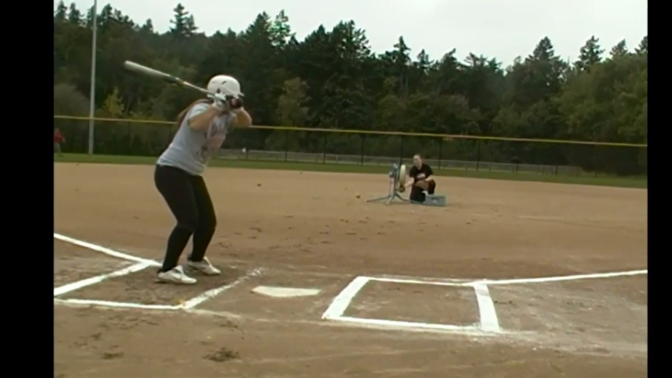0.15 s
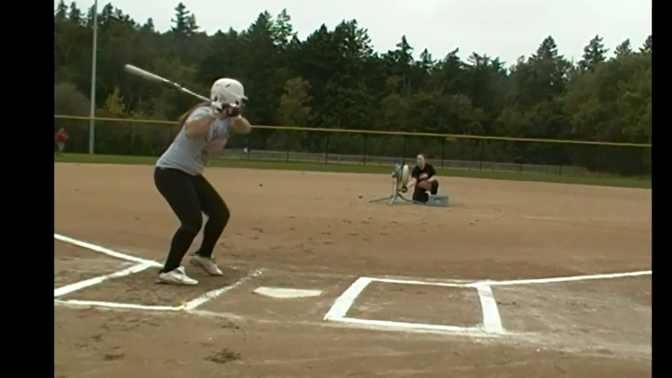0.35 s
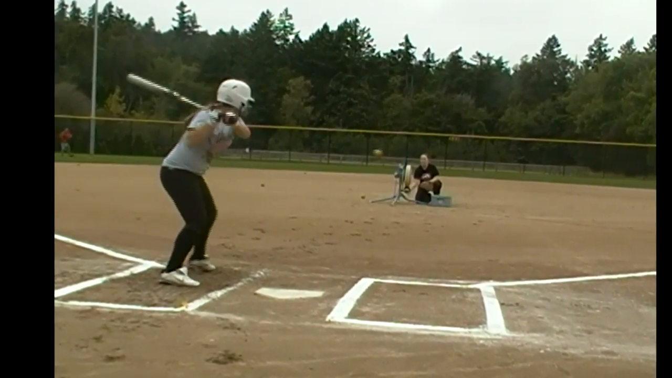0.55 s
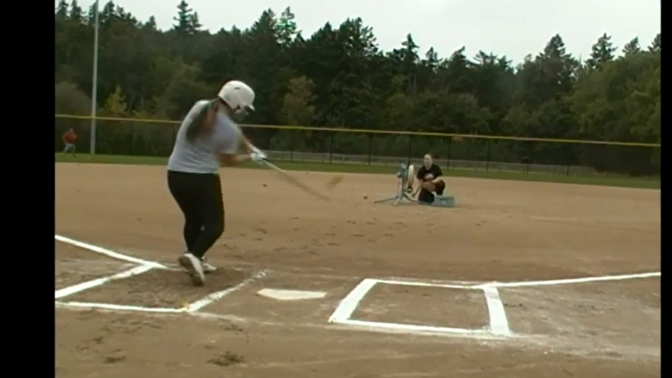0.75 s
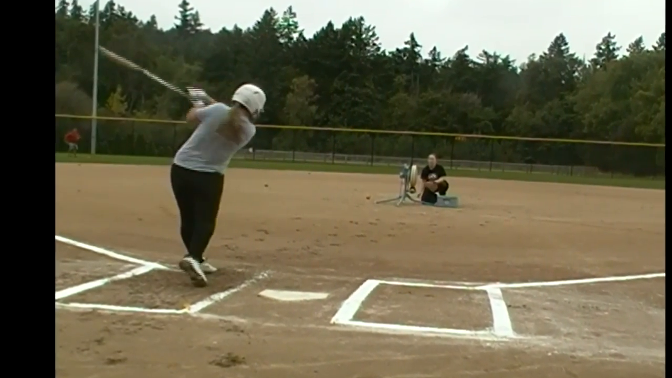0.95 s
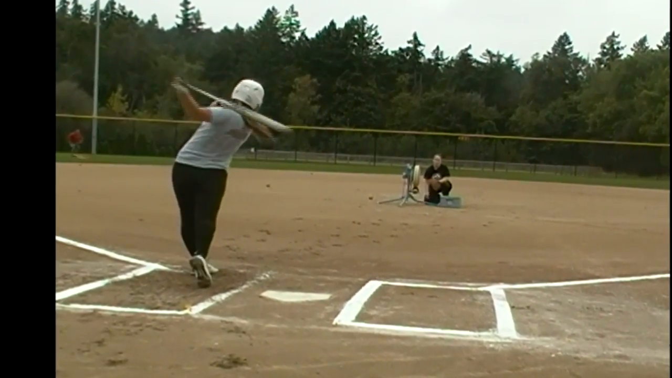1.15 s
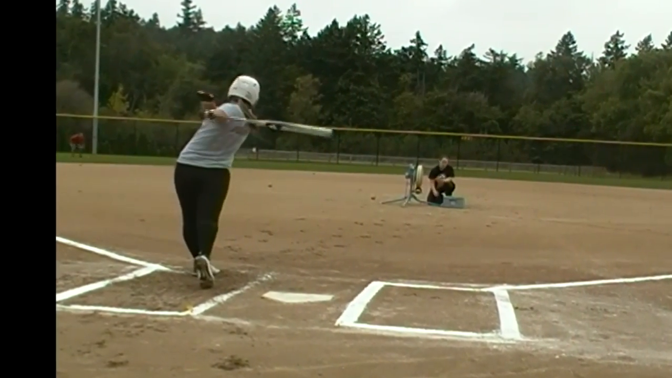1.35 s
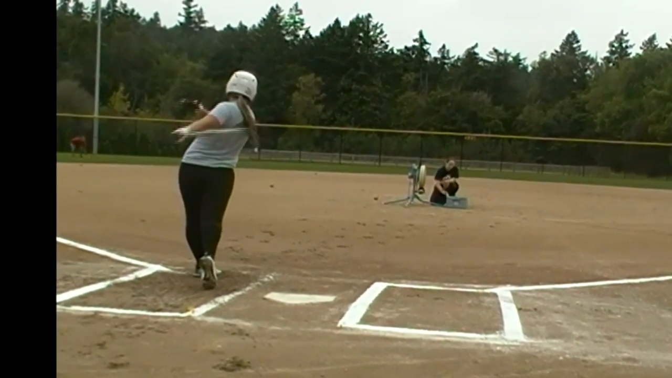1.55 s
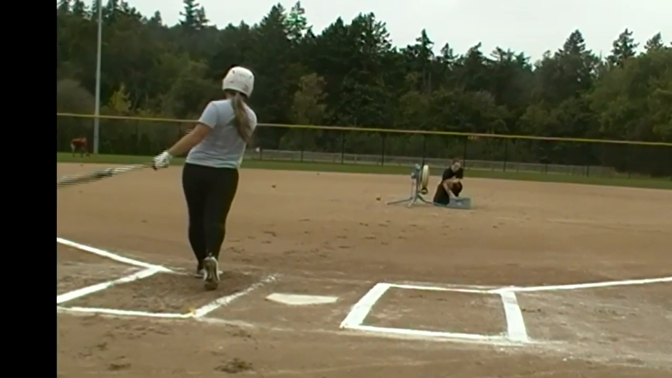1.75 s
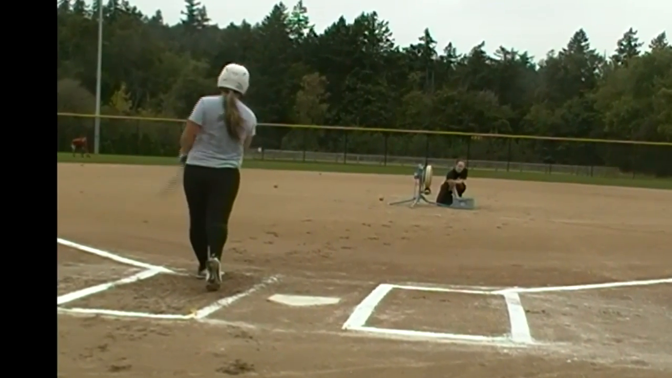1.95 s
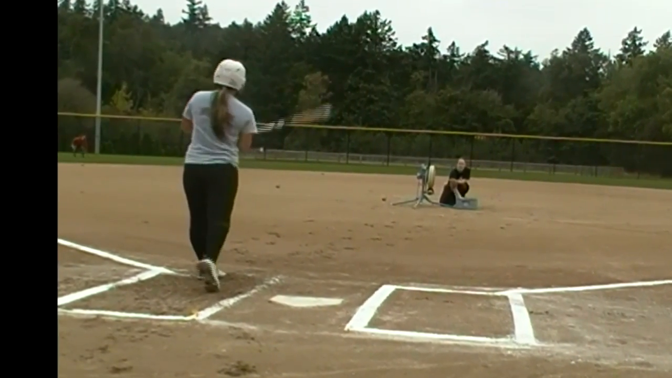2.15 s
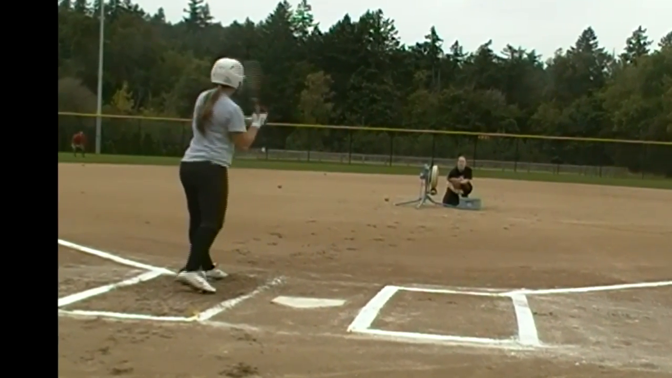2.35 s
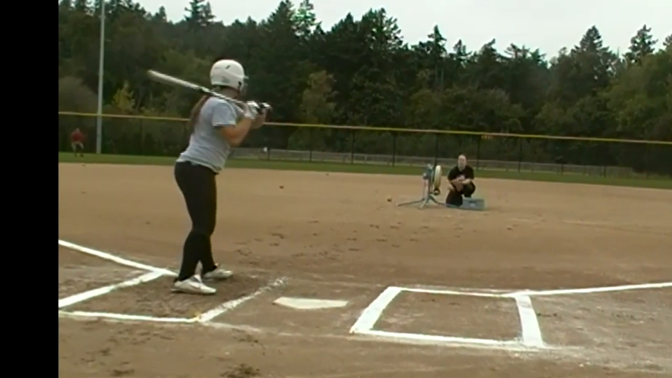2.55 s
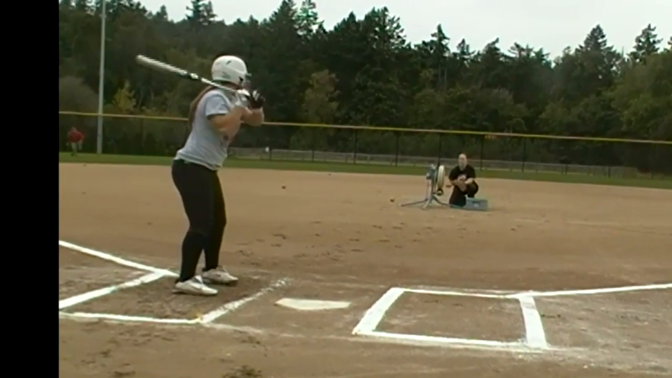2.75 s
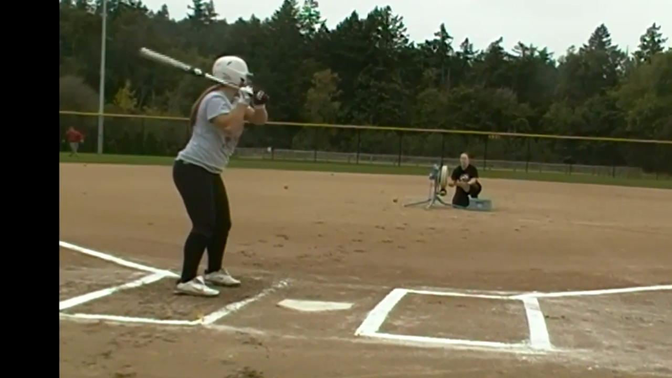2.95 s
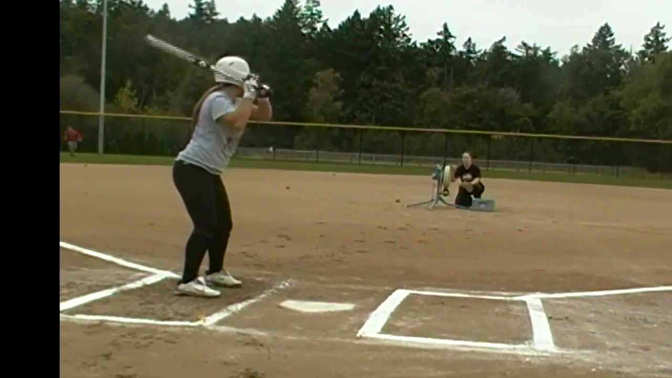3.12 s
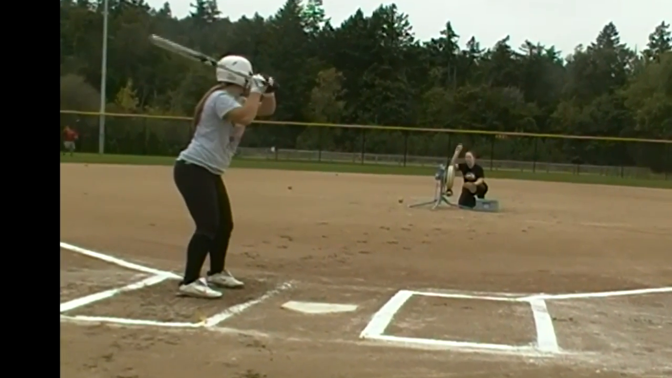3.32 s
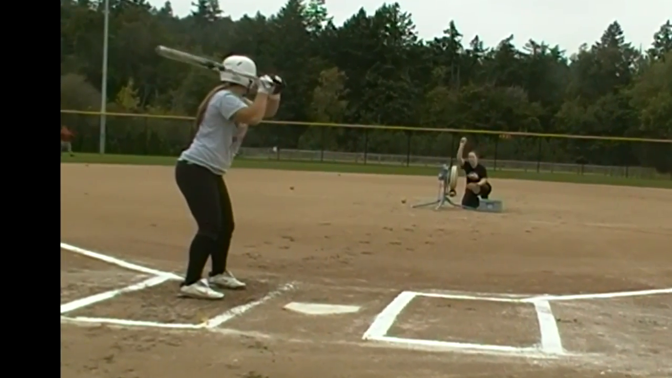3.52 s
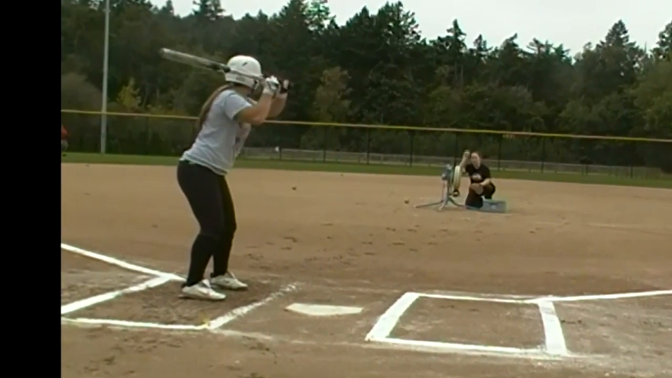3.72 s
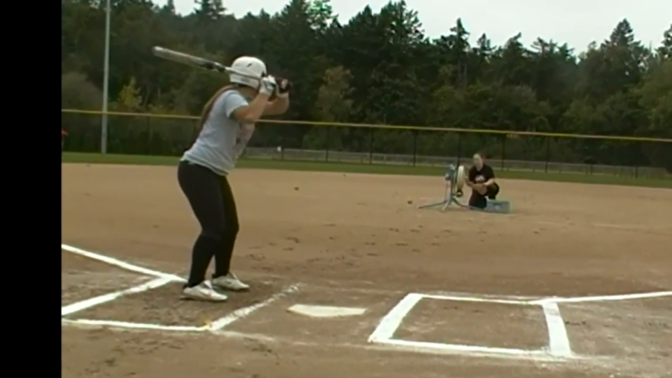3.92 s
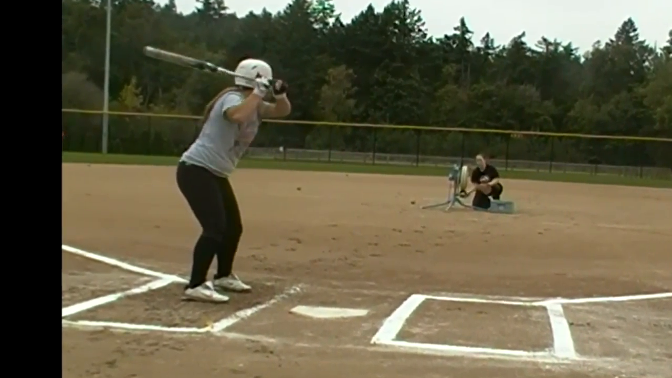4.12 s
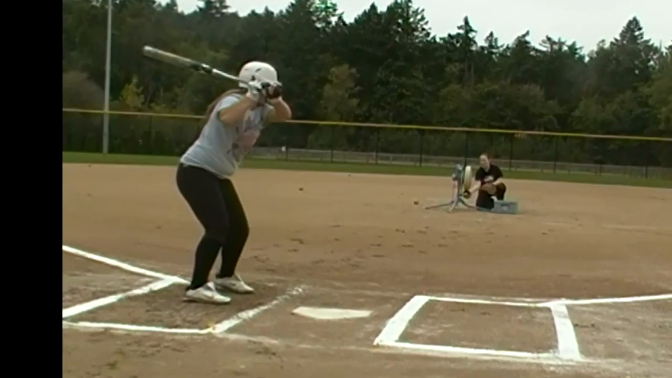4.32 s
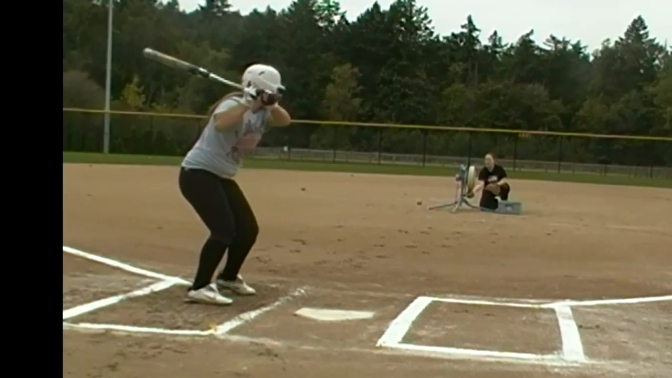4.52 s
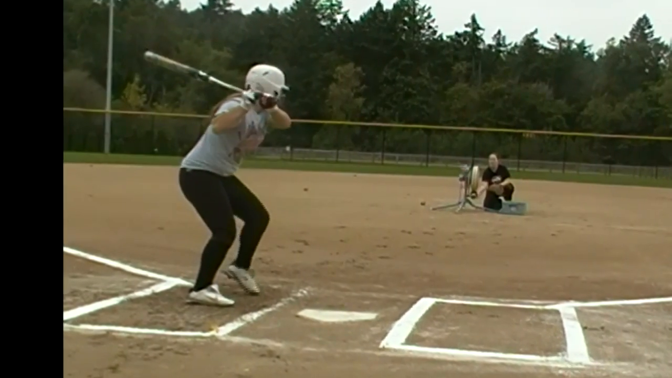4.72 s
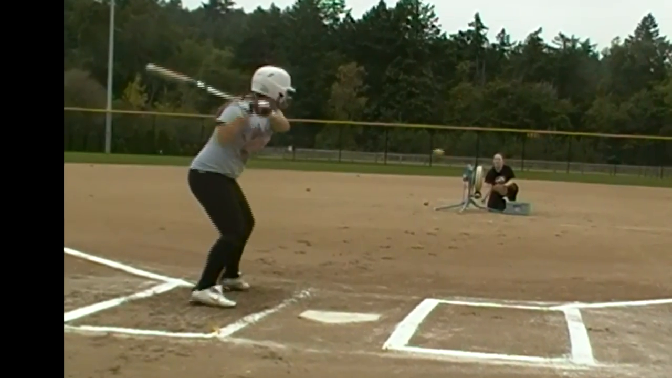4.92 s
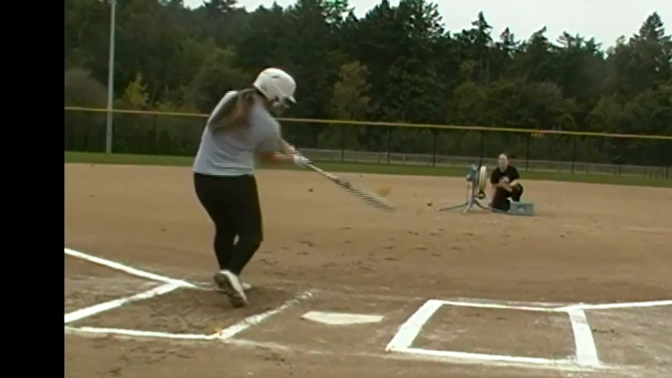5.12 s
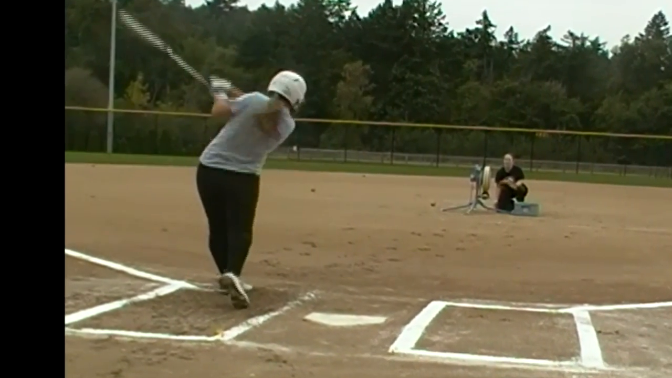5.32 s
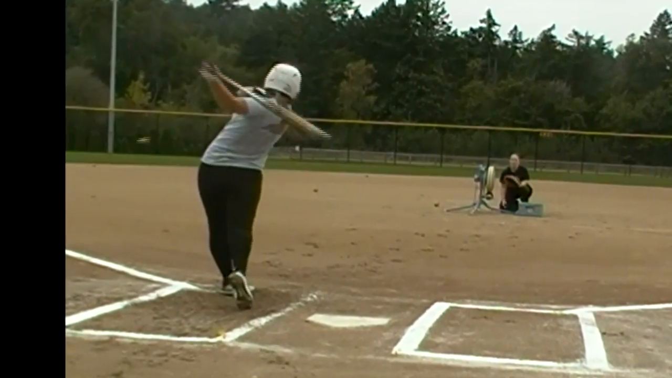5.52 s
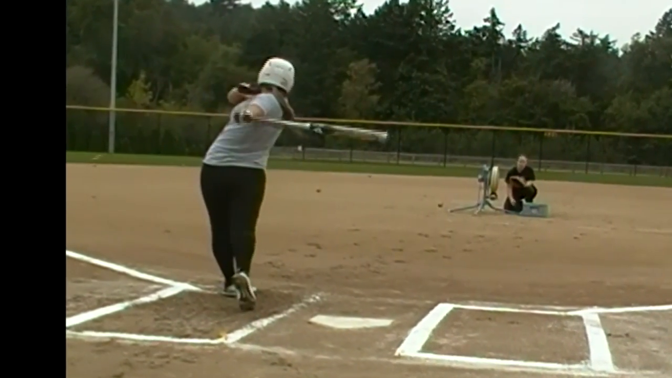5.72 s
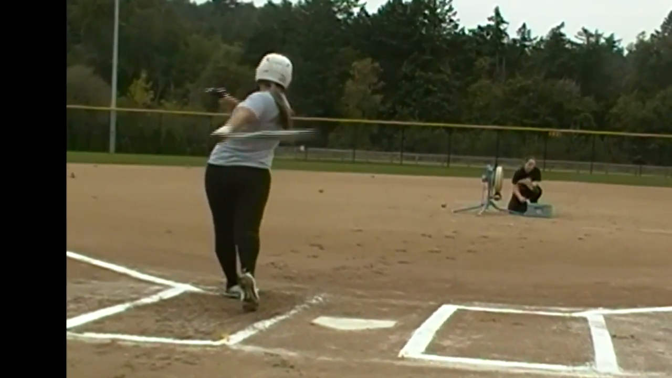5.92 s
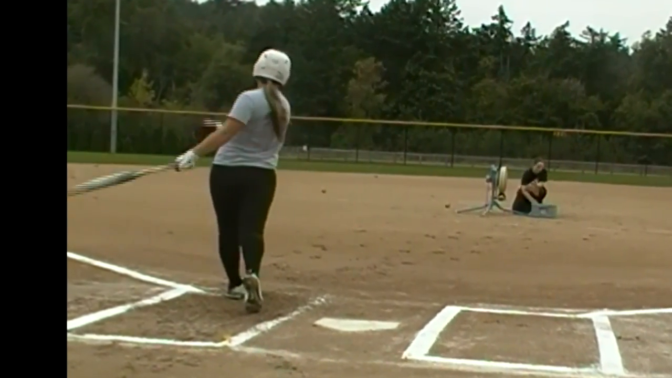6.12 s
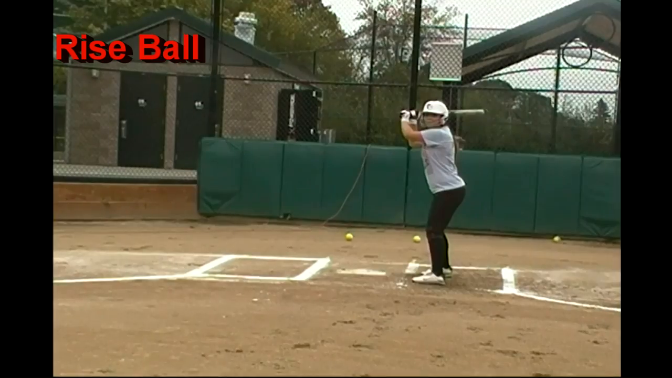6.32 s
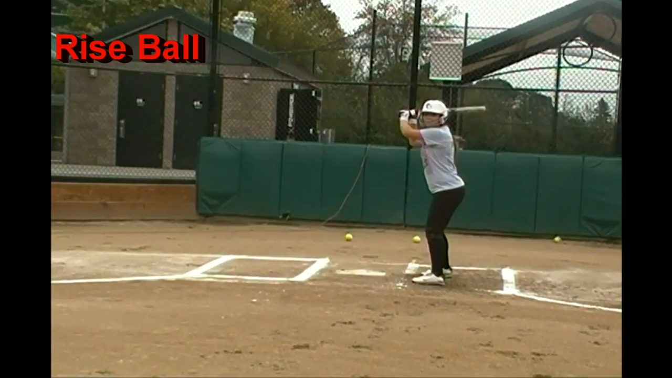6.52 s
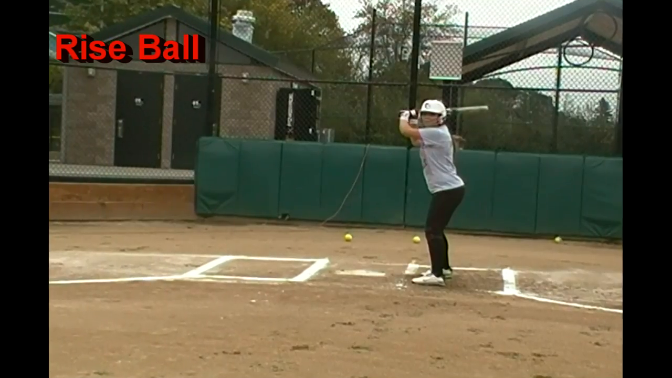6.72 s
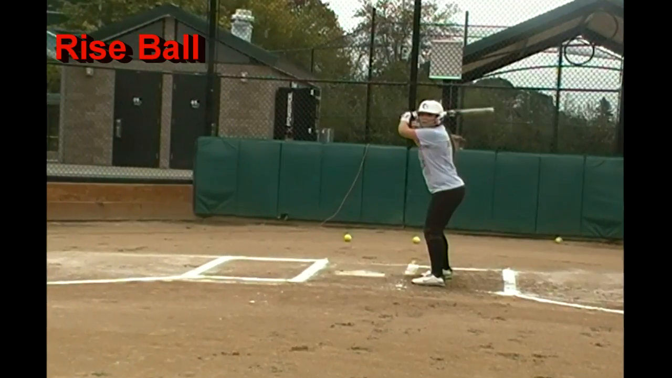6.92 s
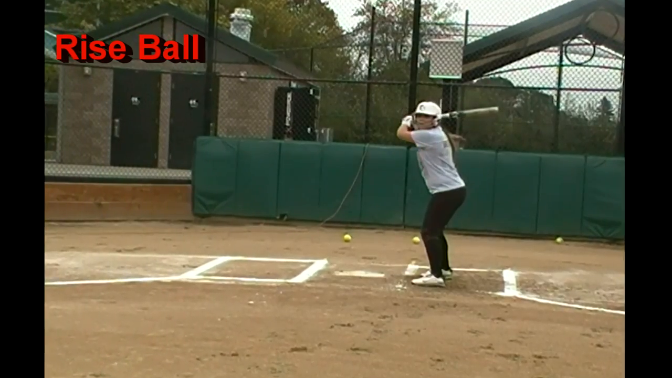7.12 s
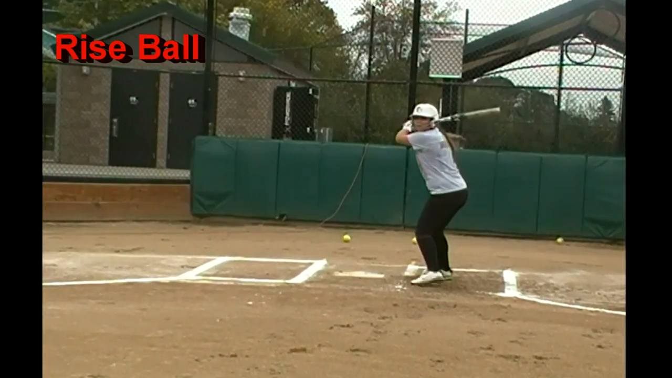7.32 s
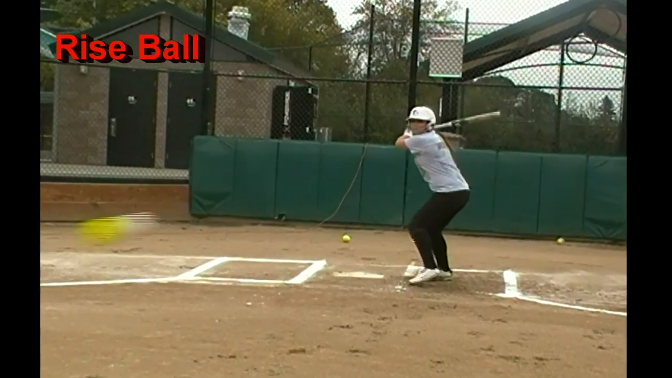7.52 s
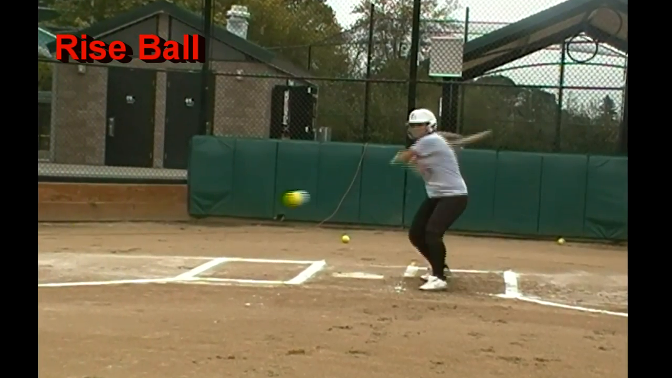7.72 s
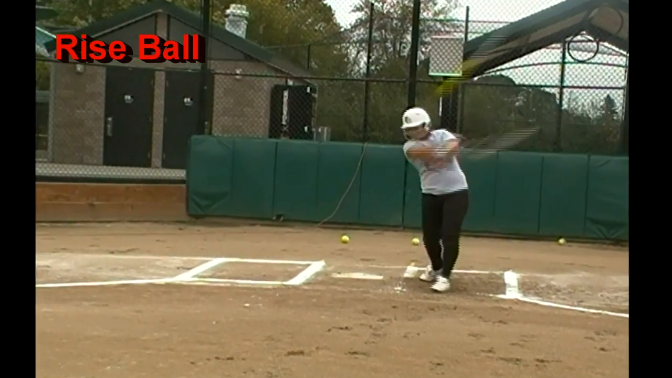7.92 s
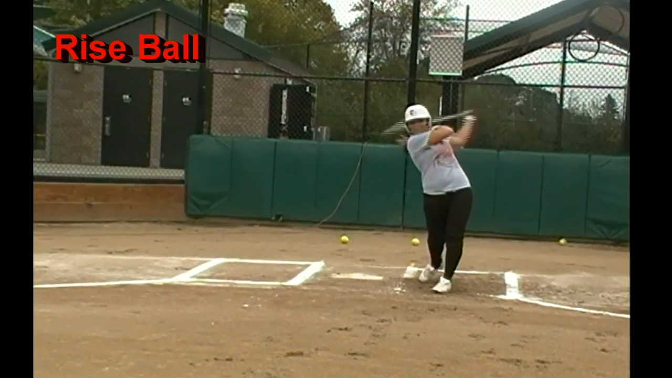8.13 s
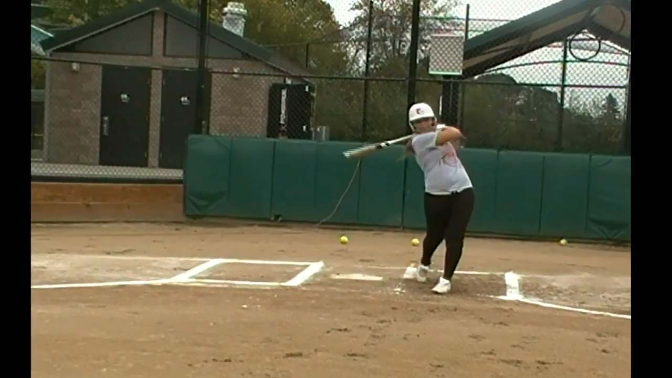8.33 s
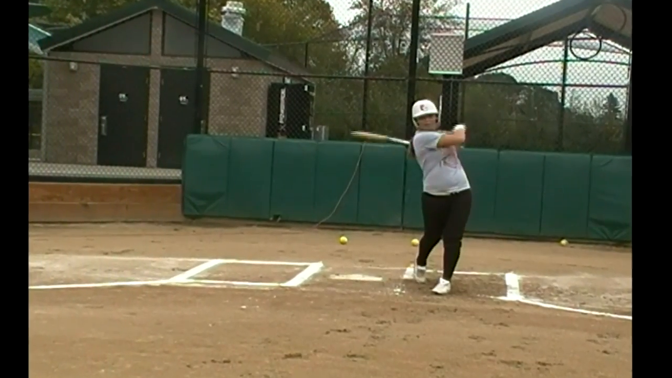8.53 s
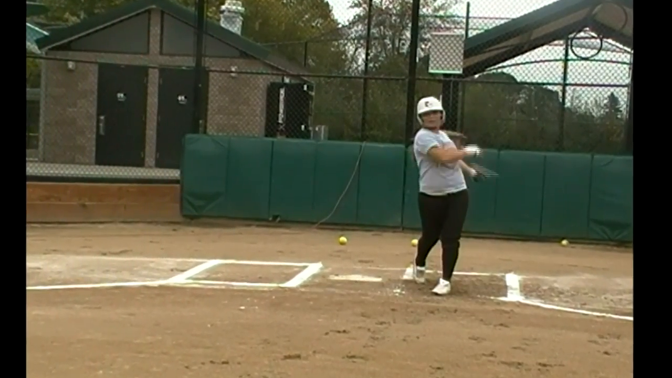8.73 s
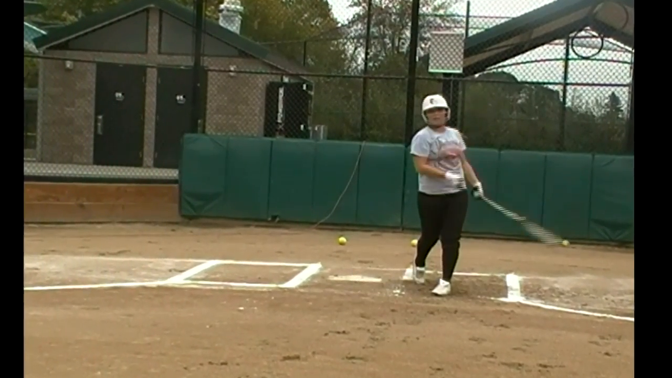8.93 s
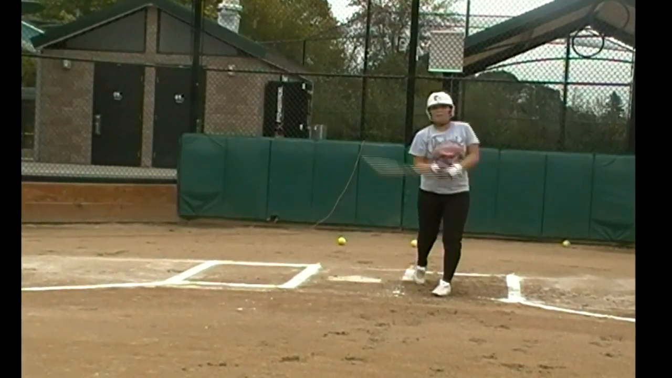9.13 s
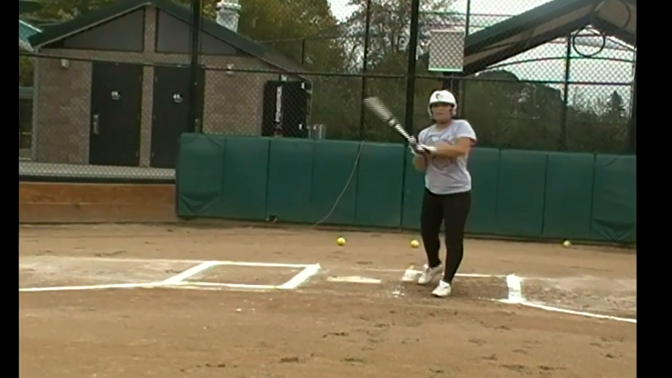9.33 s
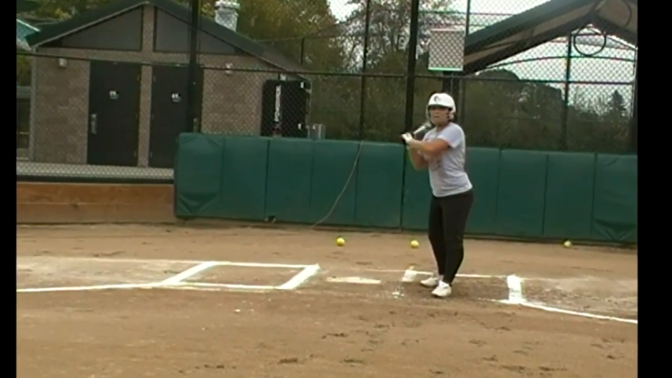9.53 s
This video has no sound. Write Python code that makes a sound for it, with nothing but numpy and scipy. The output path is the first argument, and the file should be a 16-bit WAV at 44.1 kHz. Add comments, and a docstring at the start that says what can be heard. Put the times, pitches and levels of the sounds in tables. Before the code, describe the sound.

From 0 to 6.3 seconds the microphone is behind the plate on an open field: a soft mid-low hum, strongest at first and gradually fading, with low rumble and a thin far motor whine. At about 0.45 a distant machine gives a muffled thump; at 0.96 a bat cracks loudly, dry and hard, with immediate backstop slap, later faint echoes and a brief tree-line wash. A dull thud follows at 1.1, then faint ticks and foot scuffs around 1.8 and 2.5. Feeding rattles at 4.75 lead to another thump at 4.8 and a brighter, stronger crack at 5.3. A light thud comes at 6.1. After a tiny gap, from 6.3 a loud close motor whirs steadily, rough and whiny. At 7.55 a ball clatters and launches with a heavy thump and snap; the motor sags slightly. A farther hit knocks at 8.02, its stronger slaps at 8.07, then motor continues alone.

```python
"""Mains hum, field rumble and a far motor open the scene behind the plate of an outdoor field, where a wheel
machine throws two pitches and a bat meets each; after a short gap its loud motor is heard from close by, with
one pitch and a far hit. Pulsed resonances make ball, feet and far hit; decaying modes with reflections make
the near bat; turn-locked tones, a scrape and shaped noise make the near motor. A stereo microphone receives
all of it, and its gain control ducks after loud peaks."""
import sys
import numpy as np
from scipy import signal
from scipy.fft import rfft, irfft
from scipy.io import wavfile
from scipy.ndimage import minimum_filter1d

SR = 44100
rng = np.random.default_rng(int(sys.argv[2]) if len(sys.argv) > 2 else 0)


def unload_audio(sound):
    """Save the sound as a 16-bit wav file, at the path given as the first command line argument."""
    columns = np.transpose(np.atleast_2d(sound))
    # keep every value between -1 and 1, then stretch to whole-number steps
    steps = np.round(np.clip(columns, -1, 1) * 32767)
    wavfile.write(sys.argv[1], SR, steps.astype(np.int16))


N = 421596

LAG_PLATE, LAG_MACHINE = 2.25, 3.17   # samples by which the left channel is later, below MONO_ABOVE_HZ
MONO_ABOVE_HZ = 6850   # above this both channels carry the same signal

# Pitches: t/s, throw level/dB, snap level/dB, field echo level/dB
PITCHES = [(0.457, 1, -10, -16), (4.807, 0.5, -9.5, -18.5), (7.565, 11.5, 1.5, -12.5)]
# Near bat hits: t/s, peak level/dB, gain of modes above 1 kHz/dB, wash from the tree line: level/dB
BAT_HITS = [(0.9648, 9, -7.5, -20), (5.3140, 12, 1, -17.5)]


def amp(db):
    """Level to amplitude: 20 dB are a factor of ten."""
    return 10 ** (np.asarray(db) / 20)


def rms_one(x):
    """Normalises the mean power to 1."""
    return x / np.sqrt(np.mean(x ** 2) + 1e-20)


def in_time(rows):
    """Linear interpolation of each column over time, one value a sample."""
    times, *columns = np.transpose(rows)
    return [np.interp(np.arange(N) / SR, times, column) for column in columns]


def at_hz(points):
    """Interpolates a spectrum over log frequency onto the FFT bins."""
    hz, value = np.transpose(points)
    bins_hz = np.fft.rfftfreq(N, 1 / SR)
    return np.interp(np.log(bins_hz + 1), np.log(hz), value)


def drift(rate):
    """Slow random fluctuation: normal draws of spread 1, rate of them a second, joined by lines."""
    knots = rng.standard_normal(int(N / SR * 60))
    return np.interp(np.arange(N) / SR * rate, np.arange(len(knots)), knots)


def resonate(x, hz, width_hz):
    """A two-pole resonance: band edges of the given width whose geometric mean is hz."""
    low = np.hypot(hz, width_hz / 2) - width_hz / 2
    high = min(low + width_hz, .45 * SR)
    b, a = signal.butter(1, [low, high], "band", fs=SR)
    return signal.lfilter(b, a, x)


def ports(x, lag, blend_hz=40):
    """Delay between channels: left later below MONO_ABOVE_HZ; above it, same signal, slightly louder left."""
    left_db = 0.5   # left louder than right by this, at all frequencies
    turn_rad = 0.042   # extra phase below MONO_ABOVE_HZ: left turned back, right forward
    hz = np.fft.rfftfreq(N, 1 / SR)
    apart = .5 - .5 * np.tanh((hz - MONO_ABOVE_HZ) / blend_hz)   # blend_hz sets how gradual the join is
    turn = np.exp(-1j * (np.pi * hz * lag / SR + turn_rad) * apart)
    return irfft(rfft(x) * [turn, turn.conj()], N) * amp([[left_db / 2], [-left_db / 2]])


def hiss(spectrum, lag):
    """Partial coherence: coloured noise of rms 1, mostly shared by the channels, with a little of their own."""
    # Power share common to both channels, below MONO_ABOVE_HZ: f/Hz, share [0..1]
    likeness = [(30, .4), (60, 0.86), (130, 1), (700, 0.96), (1500, 0.9), (4000, 1), (6500, .62)]
    alike = np.clip(at_hz(likeness), 0, 1)
    alike[round(MONO_ABOVE_HZ * N / SR):] = 1
    shared, *own = rfft(rng.standard_normal((3, N))) * amp(at_hz(spectrum))
    common = ports(irfft(shared * np.sqrt(alike), N), lag)
    separate = irfft(own * np.sqrt(1 - alike), N)
    return rms_one(common + separate)


def tone(cycles, db, waver_db):
    """Phase accumulation: a sine follows a running count of cycles, its rms level wavering about db."""
    level = amp(db + waver_db * drift(11))
    return np.sqrt(2) * level * np.sin(2 * np.pi * (cycles + rng.random()))


def swell(rise, t60, size):
    """Exponential decay: after a quadratic rise the envelope falls by 60 dB in t60."""
    t = np.arange(size) / SR
    return np.minimum(t / rise, 1) ** 2 * amp(-60 * np.maximum(t - rise, 0) / t60)


def knocks(rows):
    """Forced resonance: a rough push excites a band. Rows: t/s, level/dB, f/Hz, width/Hz, rise/s, t60/s."""
    size = 16000   # samples
    out, rough = np.zeros(N + size), rng.standard_normal((len(rows), size))
    for (s, db, hz, width_hz, rise, t60), grit in zip(rows, rough):
        shape = swell(rise, t60, size)
        ring = shape * np.cos(2 * np.pi * hz * (np.arange(size) / SR - rise))
        body = resonate(resonate(shape * grit, hz, width_hz), hz, 2 * width_hz)
        body = body / np.abs(body).max()
        body = body + .8 * ring / (1 + (width_hz / 250) ** 2)   # narrow ones ring clean
        i = round(s * SR)
        out[i:i + size] += amp(db) * body / np.abs(body).max()
    return out[:N]


def placed(s, db, parts):
    """Superposition: parts with relative delay and level, put at a common time and level."""
    return [(s + delay, db + part_db, *rest) for delay, part_db, *rest in parts]


def pitches():
    """Impact and release: the ball rattles down the chute, is squeezed and snaps free; the field answers."""
    # Rattle in the feed chute: t/s, level/dB, f/Hz
    chute = [(.422, -23, 1280), (4.744, -20, 245), (4.773, -31, 700), (4.787, -25.5, 2550),
             (7.532, -2, 2250), (7.531, -6.5, 925), (7.548, 8.5, 2250), (7.557, 0, 406)]
    # One throw: delay/s, relative level/dB, f/Hz, width/Hz, rise/s, t60/s
    throw = [(-.03, -14.5, 296, 330, 0.01466, 0.37), (0, -3.5, 406, 280, .0038, 0.068),
             (.001, -3.5, 201.2, 119, 0.01036, 0.21)]
    # Rubber letting go: delay/s, relative level/dB, f/Hz, width/Hz, rise/s, t60/s
    snap = [(-.004, -0.5, 4300, 2200, 0.0097, 0.026), (-.013, -9, 7000, 11500, 0.0126, 0.084)]
    # Echo from the field: delay/s, relative level/dB, f/Hz, width/Hz, rise/s, t60/s
    throw_echo = [(0.012, 2.4, 760, 330, 0.0037, .06), (0.014, -0.96, 6600, 6000, 0.0028, 0.14),
                  (.02, 0.75, 680, 540, .016, 0.42)]
    width_share, rise_s = 0.61, 0.00282   # width as share of the resonance
    ring_s, ring_cycles = 0.028, 29   # t60 is their sum
    rows = [(s, db, hz, width_share * hz, rise_s, ring_s + ring_cycles / hz) for s, db, hz in chute]
    for s, db, snap_db, echo_db in PITCHES:
        rows += placed(s, db, throw)
        rows += placed(s, snap_db, snap)
        rows += placed(s, echo_db, throw_echo)
    return knocks(rows)


def echo(hit, hz, width_hz, smear):
    """Reflection as convolution: an uneven wall spreads the hit and colours it; peak 1."""
    wall = rng.standard_normal(2000) * np.exp(-np.arange(2000) / SR / smear)
    wall[0] = 3.9   # its flat face answers first
    back = signal.fftconvolve(hit, wall)[:SR]
    back = resonate(resonate(back, hz, width_hz), hz, 2 * width_hz)
    return back / np.abs(back).max()


def tree_wash():
    """Diffuse scattering: noise in the bands of the tree line, grainy from many small reflectors."""
    # Colour of the wash: f/Hz, width/Hz, relative level/dB
    tree_bands = [(630, 470, 4), (3050, 1700, -3), (6400, 1300, -13.5)]
    grain = amp(0.87 * np.repeat(rng.standard_normal(SR // 100), 100))
    wash = sum(amp(level) * rms_one(resonate(rng.standard_normal(SR), hz, width_hz))
               for hz, width_hz, level in tree_bands)
    return swell(rise=0.056, t60=0.47, size=SR) * grain * wash


def bat():
    """Modal decay: barrel modes and a crack, then slaps from backstop and fences and the tree-line wash."""
    # Barrel modes: f/Hz, relative level/dB, t60/s
    modes = [(493, 3.5, 0.024), (696, 0.5, 0.022), (1370, 2, 0.017), (3460, -2.5, 0.017)]
    # Reflections: delay/s, level against the hit/dB, f/Hz, width/Hz, smear time constant/s
    echoes = [(0.0097, 0.5, 747, 815, 0.006), (0.0098, -11.5, 6000, 9000, 0.015),
              (.061, -16, 4520, 4000, .003), (0.122, -21, 2800, 2500, 0.0031),
              (0.394, -28, 2900, 1780, 0.006), (.398, -29, 600, 500, .01), (.445, -30, 725, 400, 0.018),
              (0.48, -28.5, 3280, 610, 0.00029)]
    crack_db, crack_t60_s = 1, 0.03   # rms level at onset, on the scale of the modes
    out, t = np.zeros(N), np.arange(SR) / SR
    for s, db, bright_db, trees_db in BAT_HITS:
        crack = rms_one(resonate(rng.standard_normal(SR), 2600, 4900))
        hit = amp(crack_db - 60 * t / crack_t60_s) * crack
        for hz, level, t60 in modes:
            decay = amp(level + bright_db * (hz > 1000) - 60 * t / t60)
            hit += decay * np.sin(2 * np.pi * hz * t)
        heard = hit / np.abs(hit).max()
        for delay, echo_db, hz, width_hz, smear in echoes:
            heard += amp(echo_db) * np.roll(echo(hit, hz, width_hz, smear), round(delay * SR))
        out[round(s * SR):][:SR] += amp(db) * heard + amp(trees_db) * tree_wash()
    return out


def far_hit():
    """Repeated reflection: a thud with a crack on top, then its two backstop slaps, over a low wash."""
    # Hit and slaps: t/s, thud level/dB, crack level/dB
    blows = [(8.024, 6, -0.5), (8.067, 13, 1), (8.0766, 11.5, 6)]
    # Wash after the hit itself: delay/s, relative level/dB, f/Hz, width/Hz, rise/s, t60/s
    low_wash = [(.07, -11, 431, 356, 0.02, 0.21), (.105, -20.5, 420, 462, .03, 0.64)]
    # Thud: delay/s, relative level/dB, f/Hz, width/Hz, rise/s, t60/s
    thud = [(0, -4, 297, 170, 0.0012, 0.028), (0, -3, 530, 370, 0.00047, 0.032)]
    # Crack: delay/s, relative level/dB, f/Hz, width/Hz, rise/s, t60/s
    sharp_crack = [(0.0009, 0, 2400, 4400, 0.00032, 0.013)]
    first_s, first_db, _ = blows[0]
    rows = placed(first_s, first_db, low_wash)
    for s, db, crack_db in blows:
        rows += placed(s, db, thud) + placed(s, crack_db, sharp_crack)
    return knocks(rows)


def wheel_speed():
    """Energy exchange: turns per second sag as the near ball is gripped, then return exponentially."""
    steady, sag = 35.37, .49   # turns per second
    sag_s, regain_s = .09, 3.4   # length of the sag, time constant of the return
    since = np.maximum(np.arange(N) / SR - PITCHES[-1][0] + sag_s / 2, 0)
    return steady - sag * np.minimum(since / sag_s, 1) * np.exp(-since / regain_s)


def motor():
    """Order spectrum of rotation: tones at multiples of the turn rate, a scrape per turn, and air noise."""
    # Strongest orders: multiple of the turn rate [1], level before the casing/dB
    orders = [(13, -42.5), (15, -41.5), (17, -46), (21, -42), (23, -40), (27, -54), (29, -53), (30, -42),
              (56, -49.5), (61, -45), (69, -45), (72, -45), (83, -47), (84, -43), (85, -44), (87, -50),
              (95, -46), (102, -44.5), (104, -54), (112, -48.5), (142, -51), (165, -52), (196, -49),
              (223, -50), (224, -51), (238, -56), (277, -53)]
    # Colour of scrape and air: f/Hz, relative level/dB
    near_colour = [(25, -10), (60, -10), (130, 4), (300, 3), (700, 4.5), (1100, 3.5), (1400, -1.5),
                   (2200, -1.5), (3500, -0.5), (5000, -5), (6500, -8), (7500, -8.5), (9500, -12.5),
                   (11000, -20.5), (12500, -28), (15500, -26)]
    scrape_db, air_db = -32, -26.5   # rms
    turns = np.cumsum(wheel_speed() + 0.0153 * drift(6)) / SR   # the speed trembles a little
    tones = sum(tone(order * turns, db, waver_db=2.0) for order, db in orders)
    tones = tones + amp(6) * resonate(tones, 2938, 34)   # a casing resonance lifts orders passing through
    scrape = np.interp(turns % 1, np.linspace(0, 1, 900), rng.standard_normal(900))
    scrape = signal.lfilter([1, -.8], [1], scrape)   # evens out the colour of the joined points
    scrape = irfft(rfft(scrape) * amp(at_hz(near_colour)), N)
    scrape = amp(scrape_db) * rms_one(scrape)
    air = amp(air_db + 1.03 * drift(14)) * hiss(near_colour, LAG_MACHINE)
    return ports(tones + scrape, LAG_MACHINE) + air


def small_sounds():
    """Short damped resonances: bat swish, dull thuds of feet and balls on dirt, dry ticks and scuffs."""
    # Bat swish before a near hit: delay/s, relative level/dB, f/Hz, width/Hz, rise/s, t60/s
    swish = (-.045, -30, 600, 1100, .04, .05)
    # Thuds: t/s, level/dB, f/Hz
    dirt_thuds = [(1.0845, -3.5, 404), (2.526, -22.5, 170), (2.542, -20, 168), (6.092, -14, 256),
                  (6.796, -20.5, 298)]
    # Ticks and scuffs: t/s, level/dB, f/Hz
    ticks = [(.642, -15, 1180), (1.826, -18, 420), (2.453, -25.5, 590), (2.635, -32, 900), (2.66, -24, 495),
             (2.698, -26, 794), (4.917, -23.5, 2790), (6.091, -26, 1200), (6.796, -17, 1200)]
    rows = [placed(s, db, [swish])[0] for s, db, *_ in BAT_HITS]
    rows += [(s, db, hz, 0.91 * hz, 0.0008, 14 / hz) for s, db, hz in dirt_thuds]   # t60 is 14 cycles
    rows += [(s, db, hz, 200 + .45 * hz, 0.00071, 0.052) for s, db, hz in ticks]
    return knocks(rows)


def field():
    """Slowly changing background by level interpolation: fading mains hum, rumble and a far motor."""
    # Levels behind the plate: t/s, hum level/dB, rumble level/dB
    levels = [(0, -29.5, -39), (.6, -31.5, -37), (1.3, -33.5, -37.5), (2.5, -37.5, -38), (3.7, -39, -38.5),
              (4.1, -39.5, -37.5), (4.6, -41.5, -39), (5.2, -42, -37), (6.27, -44.5, -37.5)]
    # Rumble colour: f/Hz, relative level/dB
    rumble_colour = [(25, -46), (60, -7), (125, 1), (200, 0), (400, -8), (750, -10), (1100, -15.5),
                     (1700, -27), (3000, -42.5)]
    # Noise heard with the far motor: treble falls; the deep notch at 12 kHz is the sound coder's, not the
    # motor's: f/Hz, relative level/dB
    coded_noise = [(500, 6.5), (1500, 0.5), (2500, 0.5), (3300, 6), (4000, 2), (5500, -2), (7200, -2),
                   (9500, -6), (11000, -11), (12000, -76), (13500, -18), (15500, -37)]
    # Far motor lines: f/Hz, rms level/dB
    lines = [(753.7, -54), (915.2, -58.5), (1922, -66), (2223, -63.5), (3015, -61), (3176, -60),
             (3408, -58.5), (3526, -62), (3671, -57.5), (3898, -70), (5507, -61.5), (7305, -61)]
    hum_hz = 360   # sixth multiple of the mains
    motor_mean_db, motor_follows = -42.5, 2.1   # motor noise swings with the rumble by this factor
    hum_db, rumble_db = in_time(levels)
    rumble_mean_db = np.mean(levels, axis=0)[2]   # over the table rows
    motor_db = motor_mean_db + motor_follows * (rumble_db - rumble_mean_db)
    t = np.arange(N) / SR
    hum = tone(hum_hz * t, hum_db, waver_db=1.14)
    whine = sum(tone(hz * t, db, waver_db=4.5) for hz, db in lines)
    rumble = amp(rumble_db + 0.48 * drift(3.9)) * hiss(rumble_colour, LAG_PLATE)
    far_motor = amp(motor_db + 1.0 * drift(7.6)) * hiss(coded_noise, LAG_PLATE)
    return ports(hum + whine, LAG_PLATE) + rumble + far_motor


def scene():
    """Superposition: background and motor of the two standpoints in turn, with band-limited blows over both."""
    t = np.arange(N) / SR
    plate = np.clip((6.272 - t) * 500, 0, 1)   # out by 6.272 s
    machine = np.clip((t - 6.307) * 250, 0, 1)   # in from 6.307 s
    band = signal.butter(2, [120, 10000], "band", fs=SR, output="sos")   # what the ports pass of a blow
    blows = bat() + pitches() + far_hit() + small_sounds()
    blows = signal.sosfilt(band, blows + 1e-18)
    return plate * field() + machine * motor() + ports(blows, LAG_PLATE, blend_hz=905)


def record(dry):
    """Dynamic compression: gain ducks after loud peaks and climbs back; the rest saturates; the top is cut."""
    threshold_db, duck_share = -11.5, 0.68   # the gain falls by this share of the excess
    attack_s, hold_s, recover_db_per_s = 0.0053, 0.03, 182   # recovery of the excess, before the share
    over_db = np.maximum(20 * np.log10(np.abs(dry).max(axis=0) + 1e-9) - threshold_db, 0)
    half = round(hold_s * SR) // 2
    over_db = -minimum_filter1d(-over_db, 2 * half + 1, origin=half)   # the peak is held for a while
    climb = recover_db_per_s * np.arange(N) / SR
    held_db = np.maximum.accumulate(over_db + climb) - climb
    r = np.exp(-1 / (attack_s * SR))
    duck_db = duck_share * signal.lfilter([(1 - r) ** 2], [1, -2 * r, r * r], held_db)   # sets in gradually
    ducked = dry * amp(-duck_db)
    clipped = np.tanh(ducked ** 3 / 3 + ducked)
    coupling = signal.butter(2, 40, "high", fs=SR, output="sos")   # coupling capacitor
    top_cut = signal.cheby2(12, 70, 15700 * 1.04, fs=SR, output="sos")   # 70 dB down from this edge up
    return signal.sosfilt(top_cut, signal.sosfilt(coupling, clipped))


dry = scene()
out = record(dry)
unload_audio(out)
```